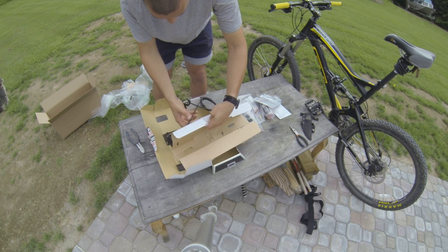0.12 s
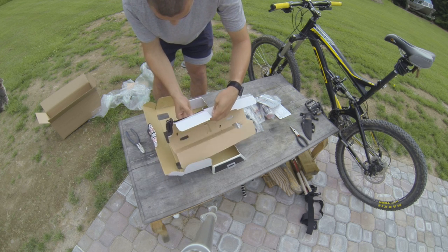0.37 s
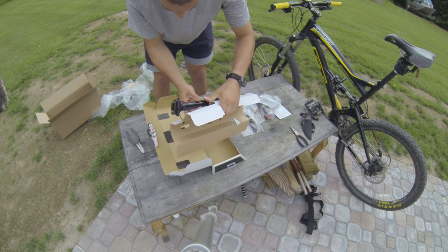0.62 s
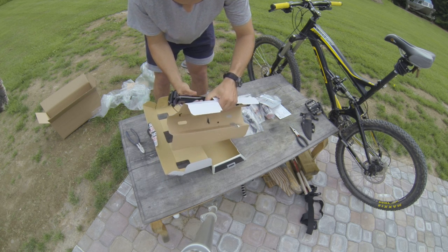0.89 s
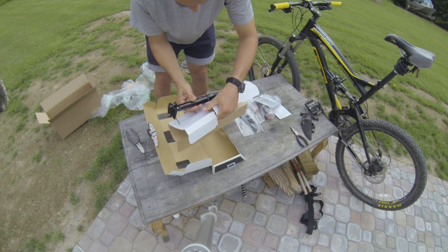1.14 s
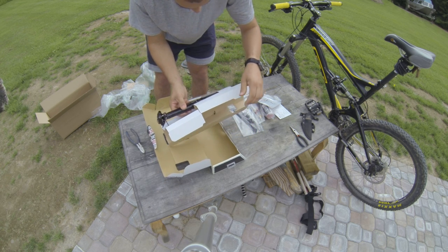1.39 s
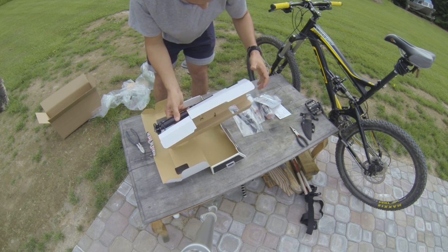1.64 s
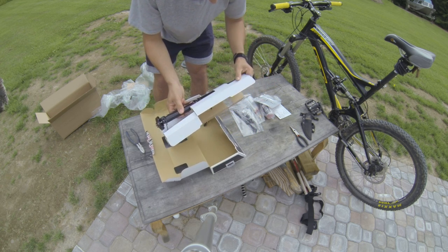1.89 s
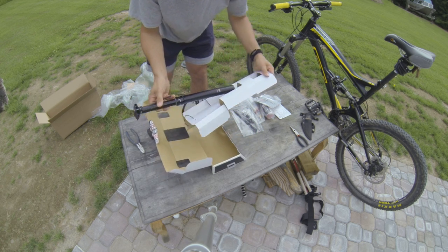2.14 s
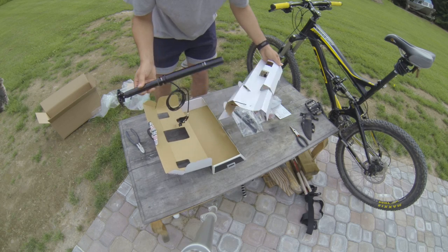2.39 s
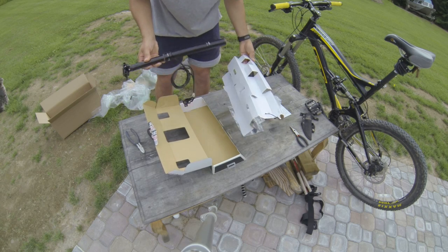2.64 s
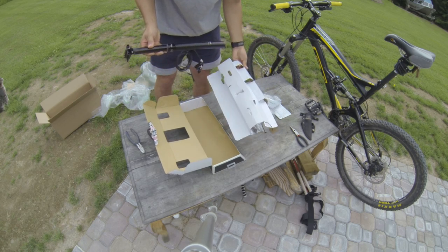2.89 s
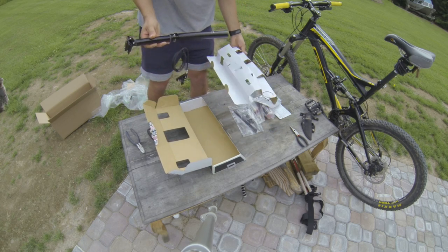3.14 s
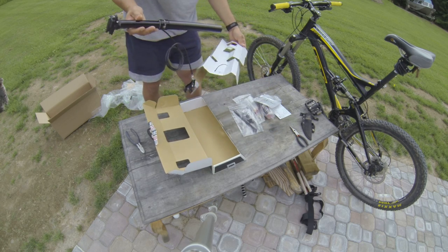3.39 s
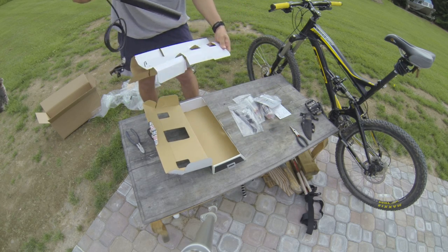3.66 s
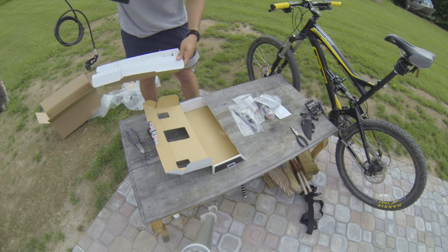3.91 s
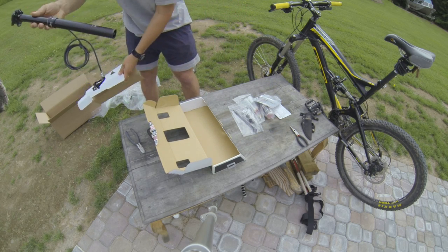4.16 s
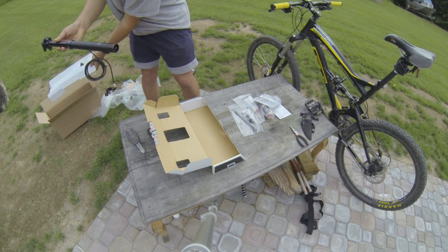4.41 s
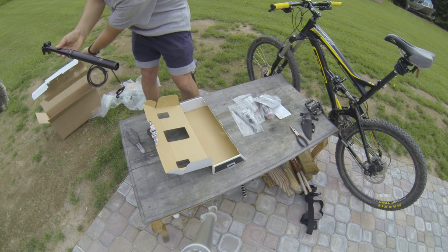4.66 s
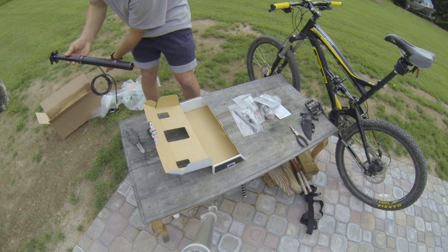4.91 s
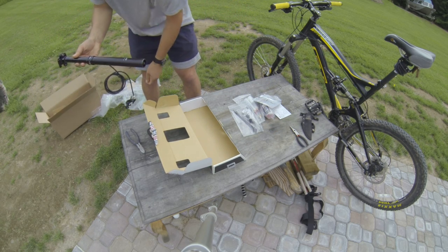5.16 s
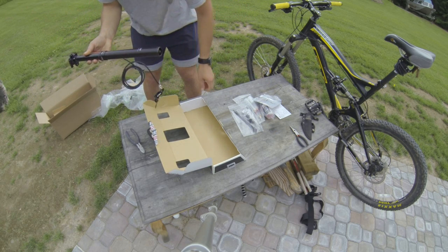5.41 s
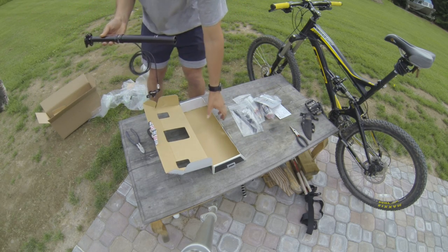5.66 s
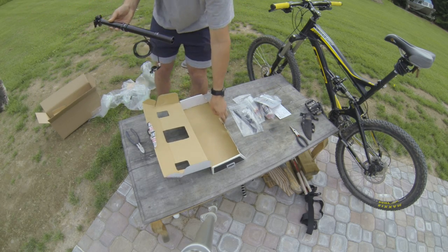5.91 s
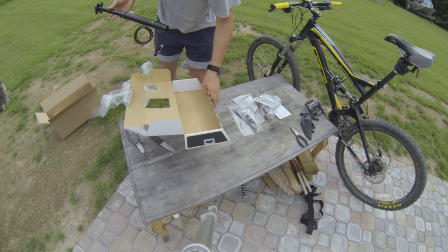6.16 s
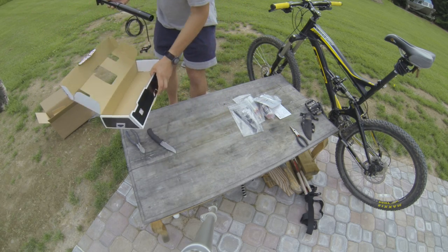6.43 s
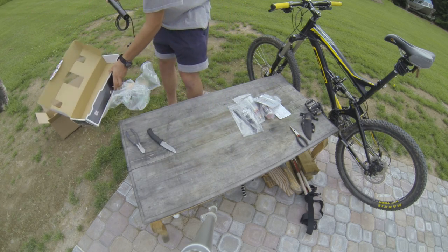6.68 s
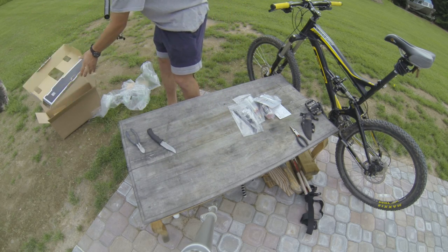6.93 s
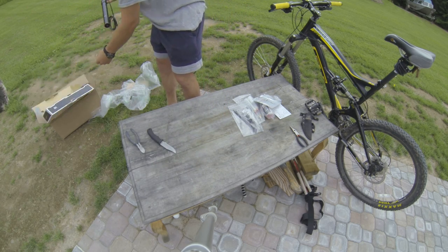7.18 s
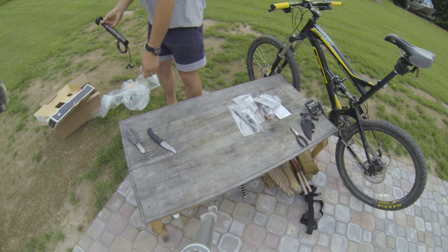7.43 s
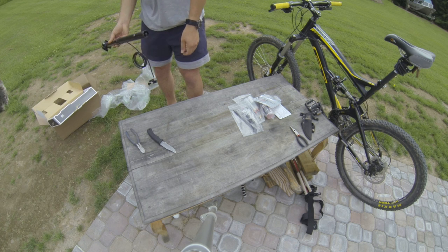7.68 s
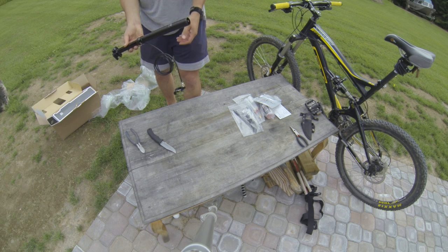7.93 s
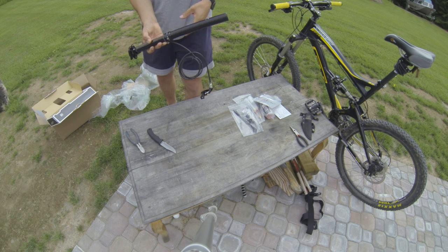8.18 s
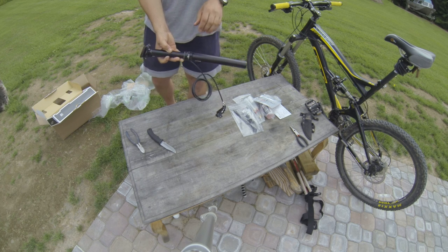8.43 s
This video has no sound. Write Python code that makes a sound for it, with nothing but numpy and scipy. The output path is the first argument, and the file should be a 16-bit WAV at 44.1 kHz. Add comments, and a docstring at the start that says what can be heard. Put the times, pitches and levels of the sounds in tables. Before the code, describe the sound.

A close, fairly dry single-channel outdoor sound of cardboard handling. From 0 to 0.4 seconds brisk woody knocks and dry rubs burst out as a folded card insert is worked loose from its tray; lighter taps and scrapes continue to about 1.6, then brighter, edgier scraping and clicks cluster from 1.8 to 2.3. It is nearly quiet until a sharp flap and crackle at 3.4, with tiny ticks after. At 4.7 to 5.0 the insert clatters onto an empty carton in the grass, duller and hollow. A quiet gap follows, with faint touches near 5.8. The tray is lifted with knocks at 6.25 to 6.35 and light taps at 6.8, then lands at 7.1 with the heaviest boxy double thud, settling until 7.7. Only a tiny tick near 8.4 follows. Throughout, soft far traffic, low engine drone, swelling around 5.5 to 7, and faint insects.

```python
"""First a folded card insert rubs and knocks as it is worked out of a cardboard tray, outdoors and close by.
It is flapped and dropped on an empty carton down in the grass; the tray follows.
Flurries of tiny contacts ring card and carton in knocks and thuds, random fibre slips make the rubbing,
and creases tick. Behind lies shaped noise, far traffic with a faint band of insects, and two low engine notes."""
import sys
import numpy as np
from scipy import signal
from scipy.fft import rfft, irfft, next_fast_len
from scipy.io import wavfile

SR = 44100
rng = np.random.default_rng(int(sys.argv[2]) if len(sys.argv) > 2 else 0)


def digitize_waveform(pressure):
    """Quantize a signal to 16-bit integers and store it at the path in sys.argv[1].

    Rows of a 2-D input are taken as channels; values are limited to [-1, 1].
    """
    field = np.atleast_2d(pressure).T
    bounded = np.clip(field, -1, 1)
    quanta = np.round(bounded * 32767).astype(np.int16)
    wavfile.write(sys.argv[1], SR, quanta)


def undo_db(level):
    """Turn decibels back into plain size, where 20 dB means ten times bigger."""
    steps = np.asarray(level, float) / 20
    return 10 ** steps


N = 377491

# card close by knocks on card or buckles:
# (time [s], level [dB], edge over panel [dB], crack below the level [dB])
CARD_KNOCKS = [(.077, -34, -20, 9), (0.122, -23.5, -13, 17), (0.132, -22.5, 0.5, 10),
               (0.182, -12.5, 4.5, 13), (.222, -18, -11, 17), (0.248, -17.5, 2.5, 18.5),
               (.2765, -27, 4, 26), (.336, -43, 3, 18), (.346, -29, 6, 18), (.634, -27.5, 4, 6.5),
               (.825, -40, -12, 16), (.855, -38.5, 17, 4), (.946, -32, -6, 15), (1.019, -39, -19, 27),
               (1.089, -35.5, 17, 6), (1.105, -27.5, -3, 33), (1.177, -23.5, 2, 11), (1.2, -28, 5, 16),
               (1.255, -42.5, 3, 10), (1.37, -46, 9, -1), (1.417, -41, 0, 17), (1.479, -45.5, 9, 16),
               (1.604, -40, 9, 7), (1.836, -27.5, 21, 14), (1.896, -30, 8, 28), (1.924, -22, 13, 19),
               (1.965, -28.5, 29, 17), (2.009, -27.5, 14, 7.5), (2.021, -22.5, 23, 8), (2.043, -29, 16, 19),
               (2.14, -27, 22, 14.5), (2.196, -34.5, 10, 10), (2.259, -27.5, -15, 23),
               (2.324, -50.5, 11, -5), (2.904, -53, 9, -8), (3.282, -53, 0, -6), (3.303, -61, 5, -17),
               (3.357, -12, 0.5, 28), (3.366, -27, -15, 6), (3.376, -30, 0, 18), (3.394, -30.5, -3, 8),
               (3.421, -25.5, 11, 15.5), (3.466, -40.5, 5, 0.5), (3.482, -38, 5, 12), (3.5, -29, -12, 36),
               (3.535, -33.5, 8, 15), (3.558, -39.5, 10, 15), (3.73, -39, 3, 28), (3.762, -44.5, 1, 28),
               (3.895, -46, 8, 13), (4.028, -46, 13, 10), (4.089, -33.5, 15, 8.5), (4.731, -32.5, 1.5, 8),
               (4.761, -25.5, -5.5, 7), (4.775, -42, 2, 2), (4.786, -26, -3, -1), (4.809, -41, 4, -7),
               (4.843, -26.5, -2, 14), (4.888, -24.5, 10, 12), (4.897, -26, -21, 15),
               (4.906, -12.5, -4.5, 1), (4.92, -25, -7, 14), (4.937, -25, 3, 20), (4.946, -26.5, 0, 1.5),
               (4.959, -25.5, -7, 12), (4.982, -40.5, 2, 0), (5.742, -43, 1, 21), (5.857, -32.5, 18, 15),
               (6.252, -18.5, -5, 18.5), (6.262, -16.5, -10, 23), (6.344, -22, -5.5, 15.5),
               (6.789, -33.5, -1.5, 13), (6.798, -34, 6, 12.5), (6.819, -28.5, -2.5, 16),
               (7.074, -11.5, -7, 12), (7.082, -14.5, -16, 23), (7.099, -26, -11, 17), (7.113, -30, -8, 15),
               (7.126, -12.5, -23, 22), (7.132, -10, -20, 15), (7.143, -17.5, -9, 16),
               (7.153, -18.5, -24, 13), (7.184, -23, -7.5, 12.5), (7.391, -39.5, -10, 8),
               (7.505, -44.5, -4, 5), (7.515, -39, -15, 20), (7.551, -47, 6, 9), (7.662, -43.5, -11, 13)]
# what the card rings with, low to high, before the grip shifts it:
# (frequency [Hz], relative level [dB], time to fall 60 dB [s])
HOLLOW_MODES = [(143, 0.5, 0.081), (228.4, -0.5, 0.04), (296, -12, 0.11), (363, 1.5, 0.038),
                (451, -3, 0.075)]
PANEL_MODES = [(472, -14, 0.0089), (599, 7.5, 0.03), (746, 9, 0.023), (835.4, 1, 0.075), (974, 5, 0.021),
               (1190, -1, 0.042)]
EDGE_MODES = [(1410, -9.5, 0.035), (1594, 7, 0.011), (1792, 9.5, 0.011), (1950, -11, 0.061),
              (2272, -9.5, 0.0079)]
CRACK_MODES = [(2856, 17.6, 0.0031), (3560, 4, 0.0067), (3840, 16, 0.0037), (5070, 2.5, 0.0048)]
CREASE_MODES = [(6900, 10, 0.0016), (8630, 2.5, 0.0053), (9870, 8, 0.0097), (11700, -14, 0.0044)]


def knocks():
    """Each knock rings panels and edges by where it lands, a crack by sharpness, a little hollow and crease."""
    hollow_below_panel_db, crease_below_crack_db = 27, 18.5
    out = np.zeros(N)
    for s, db, edge_db, crack_db in CARD_KNOCKS:
        # edges drag: the contact lasts twice as long for 41 dB more edge
        contact_s = 0.0035 * 2 ** (edge_db / 41)
        panel_level = db - max(edge_db, 0)
        edge_level = db + min(edge_db, 0)
        crack_level = db - crack_db
        parts = [(HOLLOW_MODES, panel_level - hollow_below_panel_db),
                 (PANEL_MODES, panel_level),
                 (EDGE_MODES, edge_level),
                 (CRACK_MODES, crack_level),
                 (CREASE_MODES, crack_level - crease_below_crack_db)]
        for modes, level_db in parts:
            add(out, s, undo_db(level_db) * blow(modes, contact_s))
    return out


def blow(modes, contact_s):
    """A swelling, fading flurry of tiny contacts sets off all modes, which shift with the grip; peak 1."""
    t = np.arange(SR // 5) / SR
    hz, db, t60 = np.array(modes).T[:, :, None]
    shifted = hz * (1 + .035 * rng.standard_normal(hz.shape))
    gain = undo_db(db + 3 * rng.standard_normal(hz.shape) - 60 * t / t60)
    rung = np.sum(gain * np.sin(2 * np.pi * shifted * t), axis=0)
    swell = 1 - np.exp(-t / 0.00086)
    fade = np.exp(-t / np.clip(contact_s, .0005, .03))
    flurry = rng.standard_normal(len(t)) ** 3 * swell * fade
    # one definite touch among the tiny contacts
    flurry[int(.0006 * SR)] += 9 * rng.choice([-1, 1])
    # card gives: no hard edge
    soft = signal.butter(3, [0.66 * hz.min(), 1.127 * hz.max()], "band", fs=SR, output="sos")
    out = signal.sosfilt(soft, signal.fftconvolve(rung, flurry)[:len(t)])
    return out / np.abs(out).max()


def add(out, s, sound):
    """Mix a sound in at a time in seconds."""
    i = round(s * SR)
    out[i:i + len(sound)] += sound[:N - i]


# the weight of the card comes down on a hollow box:
# (time [s], level [dB], lightness: tilt toward the upper modes [dB per octave])
BOX_THUDS = [(.131, -26, -2), (.181, -19, 1.5), (.222, -21.5, -4), (.634, -33, 8), (1.836, -41, 2),
             (2.011, -31, 1.5), (2.259, -27, -3.5), (4.759, -18.5, 14), (4.786, -23, -2),
             (4.844, -19.5, 21), (4.853, -25, 19), (4.907, -15, 21), (4.948, -20, 19), (4.96, -26, 28),
             (4.985, -34, 10), (5.04, -50, 3), (5.675, -40, -4.5), (5.742, -45, -12), (5.857, -41, 0),
             (6.165, -43, 12), (6.344, -37, 17), (6.82, -34.5, 7), (7.073, -5, 0.5), (7.079, -8.5, -4),
             (7.128, -9.5, 0), (7.15, -17.5, -7), (7.186, -25, -6), (7.21, -34, 6), (7.257, -36, -1),
             (7.392, -36, 1), (7.419, -34.5, -2), (7.543, -40, -11), (7.662, -41.5, -7)]


def thuds():
    """A landing weight sounds the hollow; a light one favours the upper modes."""
    lowest_hz = HOLLOW_MODES[0][0]
    out = np.zeros(N)
    for s, db, light_db in BOX_THUDS:
        modes = [(hz, level_db + light_db * np.log2(hz / lowest_hz), t60)
                 for hz, level_db, t60 in HOLLOW_MODES]
        add(out, s, undo_db(db) * blow(modes, contact_s=0.0015))
    return out


# card slides over card, the first row the steady handling of the insert:
# (start time [s], length [s], level [dB], hiss below that level [dB])
CARD_STROKES = [(.001, 2.12, -53.5, 18), (0.045, 0.062, -44, 21), (0.108, 0.041, -33.5, 23),
                (0.199, 0.11, -39.5, 23), (0.326, 0.044, -41, 18.5), (0.596, 0.091, -51, 13.5),
                (0.807, 0.098, -47, 19.5), (1.083, 0.12, -45, 17), (1.33, 0.092, -50.5, 18),
                (1.568, 0.098, -53, 15), (1.806, 0.021, -43.5, 8), (1.857, 0.13, -46, 3),
                (1.987, 0.041, -36.5, 12.5), (2.468, 0.078, -55.5, 12), (3.355, 0.019, -39.5, 11),
                (3.441, 0.085, -49.5, 26), (4.728, 0.094, -42, 15.5), (4.832, 0.073, -42, 15.5),
                (4.901, 0.046, -31.5, 24), (4.954, 0.079, -55, 16), (6.1, 0.058, -50, 23),
                (6.21, 0.13, -54.5, 29), (6.778, 0.024, -49.5, 18), (7.074, 0.039, -34, 28),
                (7.115, 0.041, -37.5, 13), (7.189, 0.019, -38, 28), (7.369, 0.053, -51, 20.5),
                (7.481, 0.036, -59, 20)]
# hiss of sliding fibres: (frequency [Hz], relative level [dB per Hz])
FIBRE_HISS = [(1500, -28), (2600, -2), (4500, -0.5), (5500, -9), (10000, -18.5), (12500, -29), (15000, -46)]


def slides():
    """Sliding drives the same modes as the knocks and a fibre hiss; a settling box shudders in its hollow."""
    attack_s, stroke_t60_s, hiss_t60_s = 0.022, 0.16, 0.077
    s, length, db, hiss_db = np.transpose(CARD_STROKES)
    pressure = swells(s, length, db, attack_s, stroke_t60_s)
    fibres = swells(s, length, db - hiss_db, attack_s, hiss_t60_s)
    # a hissier stroke runs along the edges; the usual hiss is 16.5 dB down
    edge_db = 0.84 * (16.5 - hiss_db) / 2
    panels = swells(s, length, db - edge_db, attack_s, stroke_t60_s)
    edges = swells(s, length, db + edge_db, attack_s, stroke_t60_s)
    # after each thud the box shudders as it settles
    thud_s, thud_db, _ = np.transpose(BOX_THUDS)
    shudder = swells(thud_s, 0 * thud_s, thud_db - 20, attack_s=0.0041, t60=0.37)

    slips = grains(1800, size_db=4.0, clump_db=3.0)
    panel_rub = undo_db(-5.5) * panels * rubbed(PANEL_MODES, slips, 1.0)
    edge_rub = undo_db(-3.5) * edges * rubbed(EDGE_MODES, slips, 1.97)
    fine_slips = grains(9000, size_db=3.0, clump_db=1.8)
    hiss = coloured(slips + fine_slips, FIBRE_HISS)
    hiss = hiss + undo_db(-15.5) * rubbed(CRACK_MODES, slips, 0.99)
    hollow = (shudder + undo_db(-9.5) * pressure) * rubbed(HOLLOW_MODES, slips, 1.6)
    return hollow + panel_rub + edge_rub + fibres * hiss


def swells(starts, lengths, db, attack_s, t60):
    """Envelopes that rise, hold and die away, summed in power."""
    power = np.zeros(N)
    for s, length, level_db in zip(starts, lengths, db):
        t = np.arange(round((length + t60) * SR)) / SR
        rise = np.minimum(t / attack_s, 1)
        fall_db = 60 * np.maximum(t - length, 0) / t60
        add(power, s, (rise * undo_db(level_db - fall_db)) ** 2)
    return np.sqrt(power)


def grains(per_s, size_db, clump_db):
    """Fibres catch and slip at random, in clumps."""
    sizes = undo_db(size_db * np.minimum(rng.exponential(1, N), 4)) * rng.choice([-1, 1], N)
    slipping = rng.random(N) < per_s / SR
    return sizes * slipping * undo_db(clump_db * drift(70))


def rubbed(modes, slips, damping):
    """Slips ring hand-damped modes, each swelling and fading on its own as the grip shifts; rms 1."""
    soft = signal.lfilter([.5, .5], [1], slips)
    out = np.zeros(N)
    for hz, db, t60 in modes:
        own_slips = np.roll(soft, rng.integers(N))
        out += undo_db(db + 3.5 * drift(25)) * ring(own_slips, hz, t60 / damping)
    return rms_one(out)


def ring(clicks, hz, t60):
    """A two-pole resonator: a unit click sets a sine of height 1 ringing and dying away."""
    r, w = undo_db(-60 / (t60 * SR)), 2 * np.pi * hz / SR
    return signal.lfilter([0, np.sin(w)], [1, -2 * r * np.cos(w), r * r], clicks + 1e-18)


# creases let go: (time [s], level [dB])
CREASE_TICKS = [(0.1296, -55), (0.143, -52), (0.169, -50), (0.1825, -42), (0.192, -34), (0.2606, -47),
                (0.285, -53), (0.6774, -51.5), (0.693, -52), (0.7427, -54), (0.855, -47), (1.177, -51),
                (1.8008, -58), (1.8274, -57), (2.641, -50.5), (2.833, -60), (3.3661, -33), (3.3977, -52),
                (3.4775, -54), (3.5603, -53), (3.645, -56), (4.787, -45.5), (6.272, -49), (6.4083, -55),
                (6.465, -43), (6.696, -54), (8.417, -49)]


def ticks():
    """Thin high snaps: very short blows ring the crease modes alone."""
    out = np.zeros(N)
    for s, db in CREASE_TICKS:
        add(out, s, undo_db(db) * blow(CREASE_MODES, contact_s=0.0013))
    return out


# card landing on the carton, down in the grass: (start time [s], end time [s])
DOWN_AT_CARTON = [(4.5, 5.2), (7.0, 7.8)]


def dulled(x):
    """Down by the carton the treble is lost; up on the table the flat tray has no deep boom."""
    s = np.arange(N) / SR
    away = sum((s > start) & (s < end) for start, end in DOWN_AT_CARTON)
    dull = signal.sosfilt(signal.butter(2, 3880, fs=SR, output="sos"), x)
    thin = signal.sosfilt(signal.butter(2, 120, "high", fs=SR, output="sos"), x)
    return np.where(away, dull, thin)


def yard(x):
    """A short dull scatter from table, ground and walls: fading noise, treble softened."""
    t = np.arange(SR // 4) / SR
    scatter = rng.standard_normal(len(t)) * undo_db(-60 * t / .1) * (t > .004)
    scatter = scatter / np.sqrt(np.sum(scatter ** 2))
    scatter = signal.lfilter([.3], [1, -.7], scatter)
    return x + undo_db(-15) * signal.fftconvolve(x, scatter)[:N]


# spectrum of the background: far traffic roar, with a faint band of insects near 5400 Hz:
# (frequency [Hz], relative level [dB per Hz])
BACKGROUND_SPECTRUM = [(18, 0.5), (61, -3.5), (85, -8), (120, -14), (257, -21.5), (492, -24), (942, -17),
                       (1480, -21.5), (2260, -30), (2900, -31), (4700, -41.5), (5400, -37.5), (6000, -45),
                       (15500, -52.5)]
# course of that background: (time [s], level [dB])
BACKGROUND_LEVEL = [(0, -53.5), (4.3, -51), (8.56, -53.5)]
# two far engine notes, the upper and the lower: (time [s], pitch [Hz], level [dB])
UPPER_ENGINE = [(0, 71.8, -64), (1.76, 67.4, -67), (3.79, 57.6, -58.5), (4.74, 60.26, -58.5),
                (5.41, 59.9, -52), (5.65, 56.77, -50), (7.03, 55.57, -49), (7.25, 56.67, -50.5),
                (8.56, 59.5, -58.5)]
LOWER_ENGINE = [(0, 34.96, -55), (8.56, 34.34, -54.5)]


def background():
    """Nearly steady shaped noise, far tyres and engines with a faint insect band, and two engine notes."""
    db, = in_time(BACKGROUND_LEVEL)
    noise = coloured(rng.standard_normal(N), BACKGROUND_SPECTRUM)
    steady = undo_db(db + .9 * drift(3)) * noise
    return steady + engine_note(UPPER_ENGINE, 2.6) + engine_note(LOWER_ENGINE, 0.77)


def engine_note(rows, waver_db):
    """A low sine whose pitch drifts and whose level wavers on its long way."""
    hz, db = in_time(rows)
    level = np.sqrt(2) * undo_db(db + waver_db * drift(2.63))
    return level * np.sin(2 * np.pi * np.cumsum(hz) / SR)


def in_time(rows):
    """Columns of a table as one value per sample."""
    s, *columns = np.transpose(rows)
    return [np.interp(np.arange(N) / SR, s, c) for c in columns]


def drift(rate):
    """Slow chance: random knots of spread 1, rate per second, joined by straight lines."""
    knots = rng.standard_normal(int(N / SR * rate) + 2)
    return np.interp(np.arange(N) / SR * rate, np.arange(len(knots)), knots)


def coloured(x, spectrum):
    """Filter a signal by a curve of (frequency [Hz], level [dB]); rms 1."""
    size = next_fast_len(N)
    hz, db = np.transpose(spectrum)
    log_f = np.log(np.arange(size // 2 + 1) * SR / size + 1)
    gain = undo_db(np.interp(log_f, np.log(hz), db))
    return rms_one(irfft(rfft(x, size) * gain, size)[:N])


def rms_one(x):
    """Scale to unit rms."""
    return x / np.sqrt(np.mean(x ** 2) + 1e-20)


def scene():
    """Card close by with the yard's scatter, traffic and insects behind; one channel."""
    card = dulled(knocks() + thuds() + slides())
    return (yard(card + ticks()) + background())[None]


def roll_off(x):
    """The treble ends steeply here."""
    return signal.sosfilt(signal.butter(12, 15630, fs=SR, output="sos"), x)


def record(dry):
    """The finished sound has no top: 60 dB down from 16 kHz."""
    top = signal.cheby2(12, 60, 16000, fs=SR, output="sos")
    mix = signal.sosfilt(top, dry)
    return roll_off(mix)


dry = scene()
out = record(dry)
digitize_waveform(out)
```